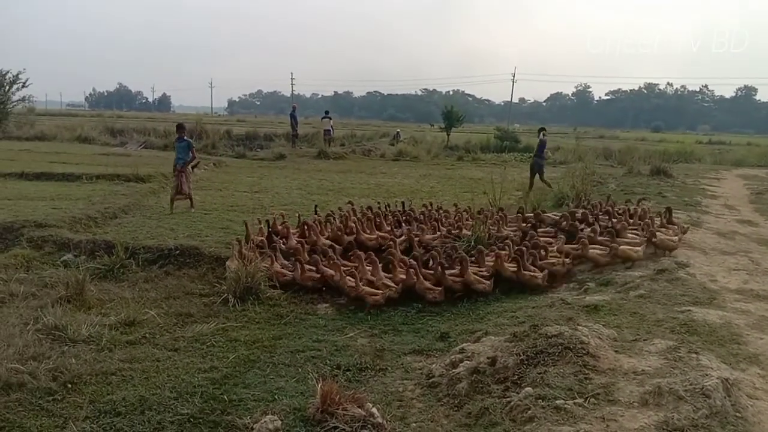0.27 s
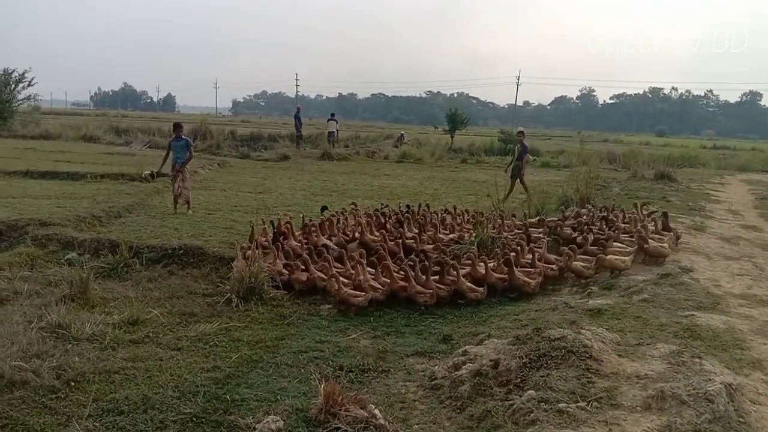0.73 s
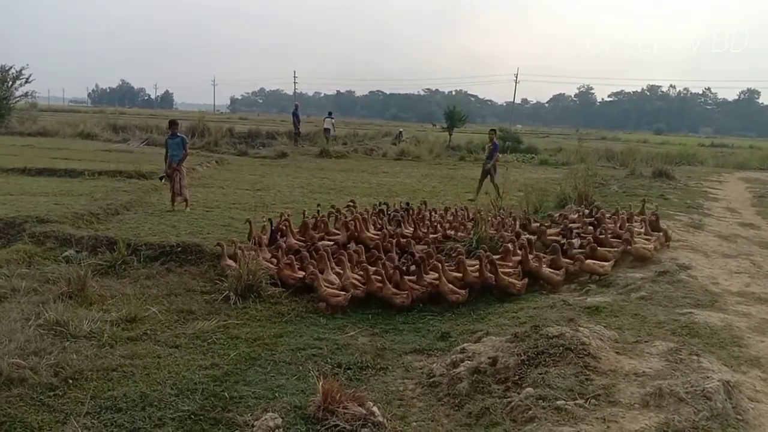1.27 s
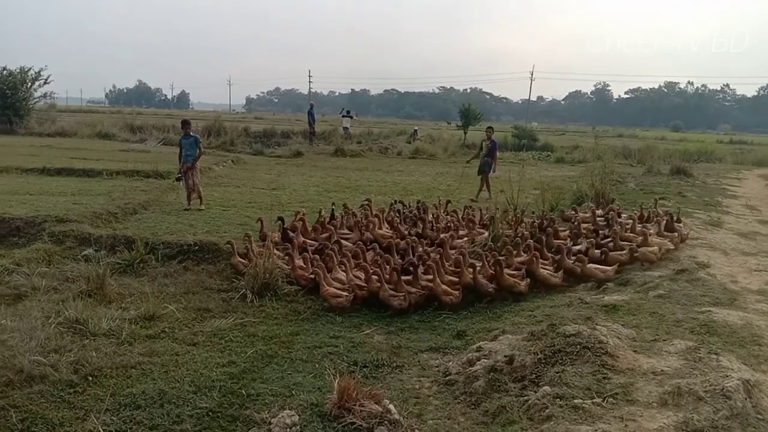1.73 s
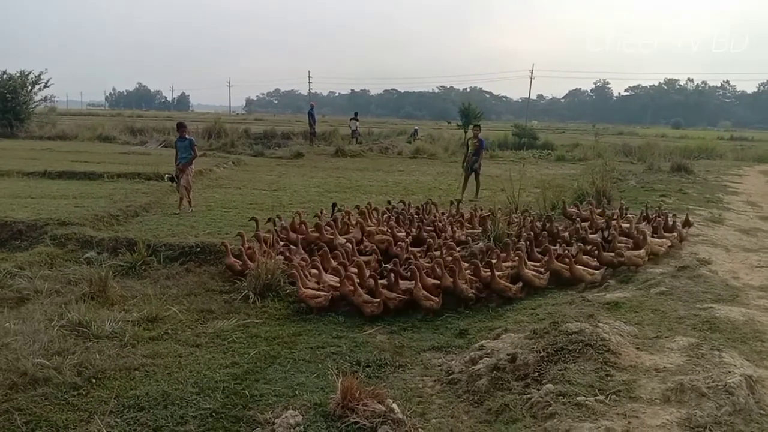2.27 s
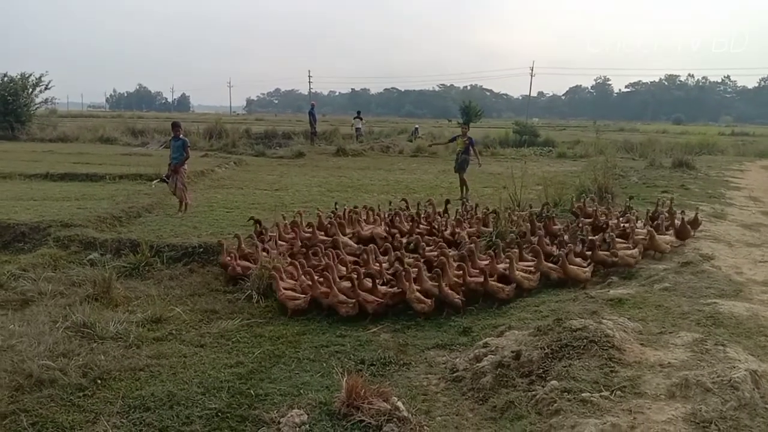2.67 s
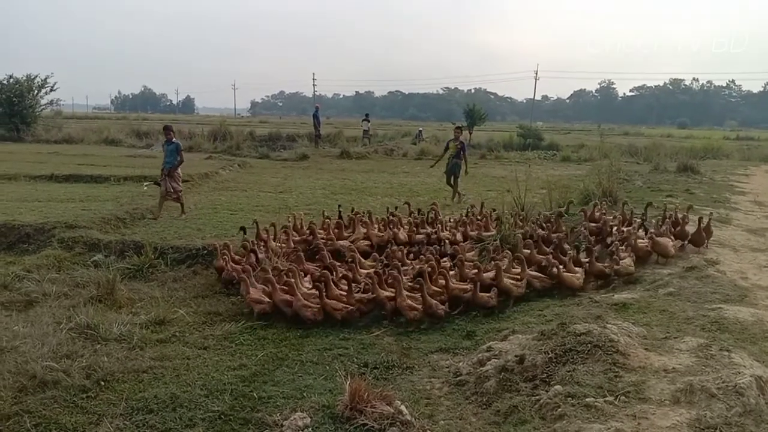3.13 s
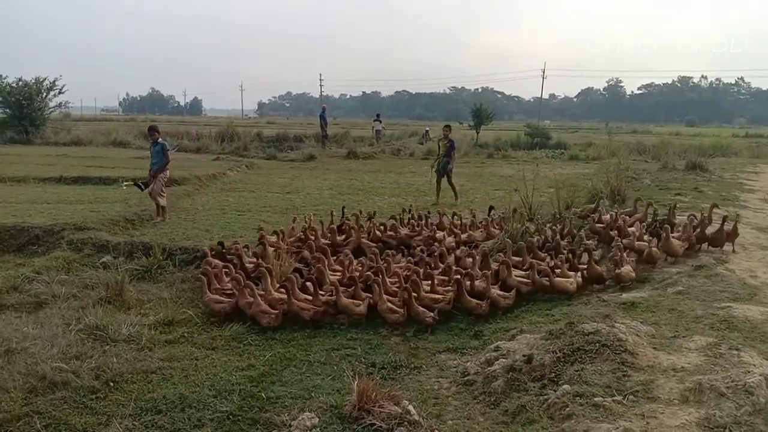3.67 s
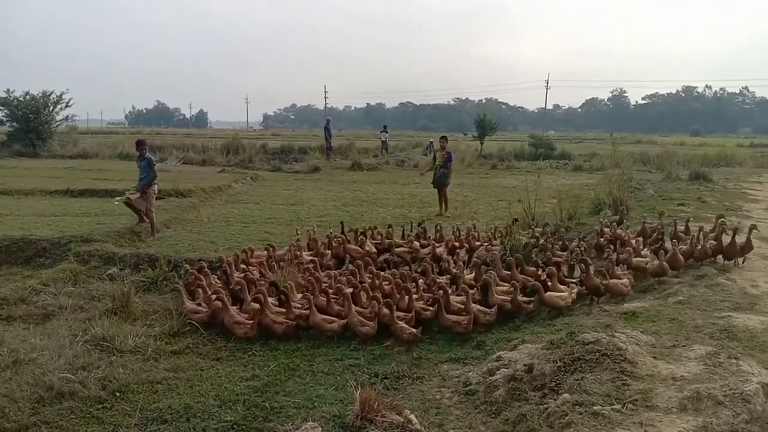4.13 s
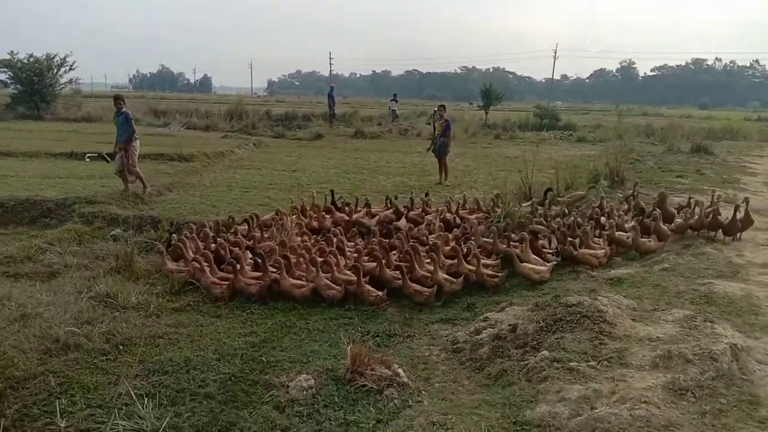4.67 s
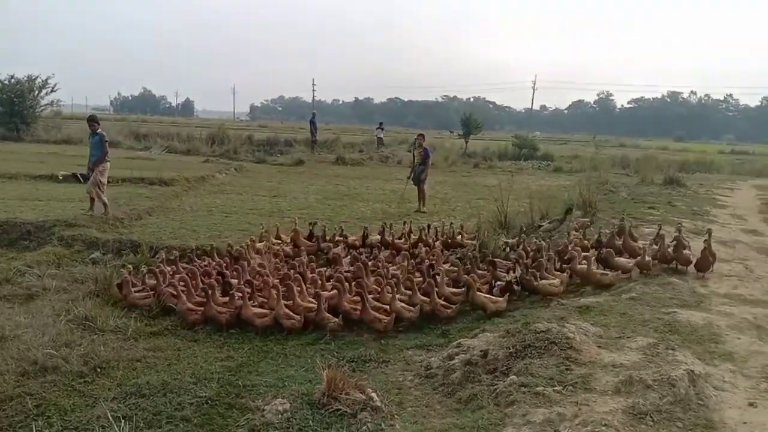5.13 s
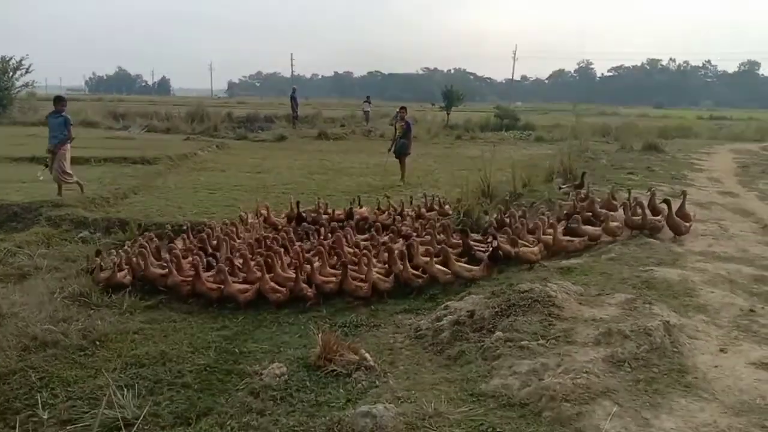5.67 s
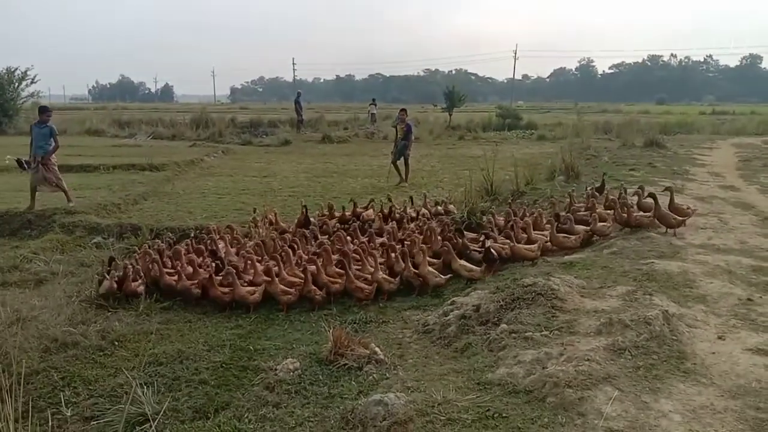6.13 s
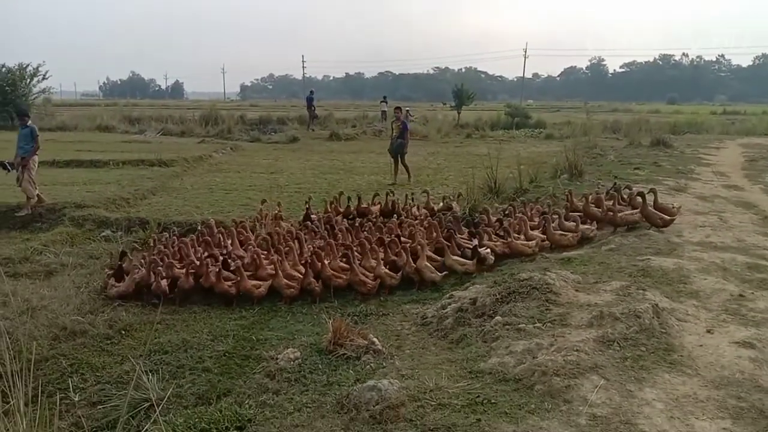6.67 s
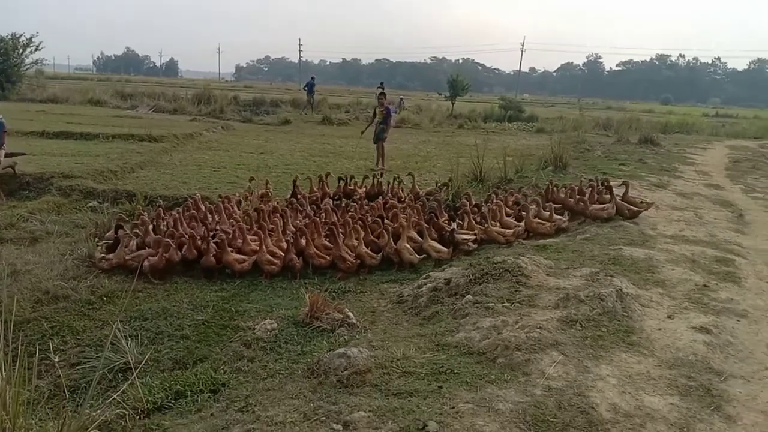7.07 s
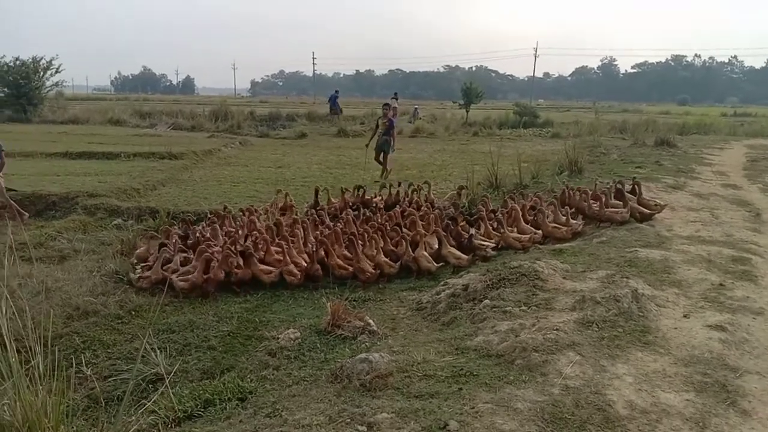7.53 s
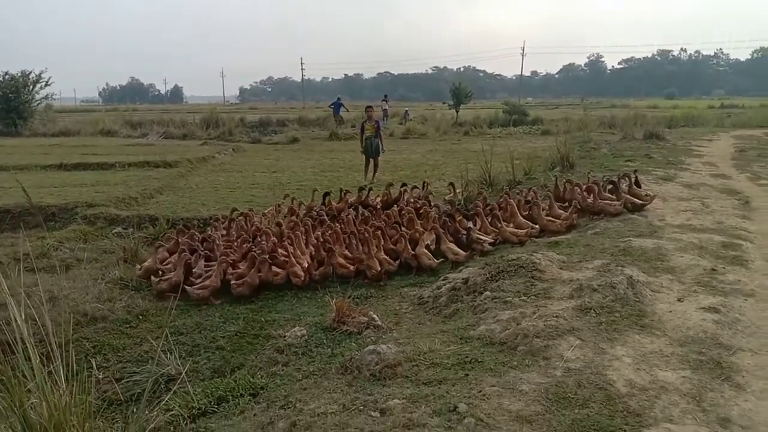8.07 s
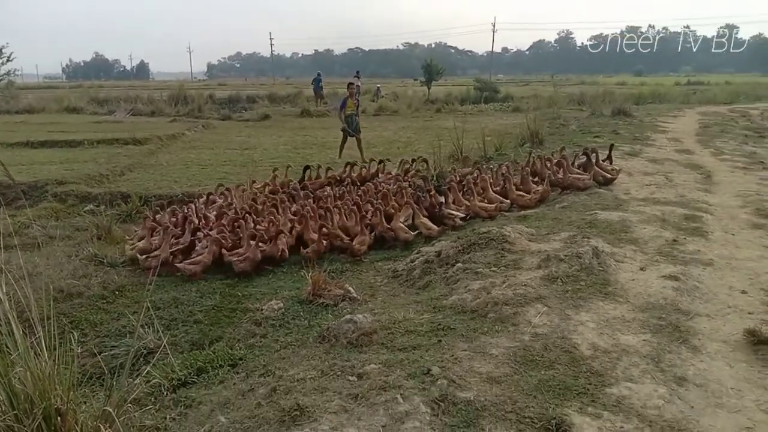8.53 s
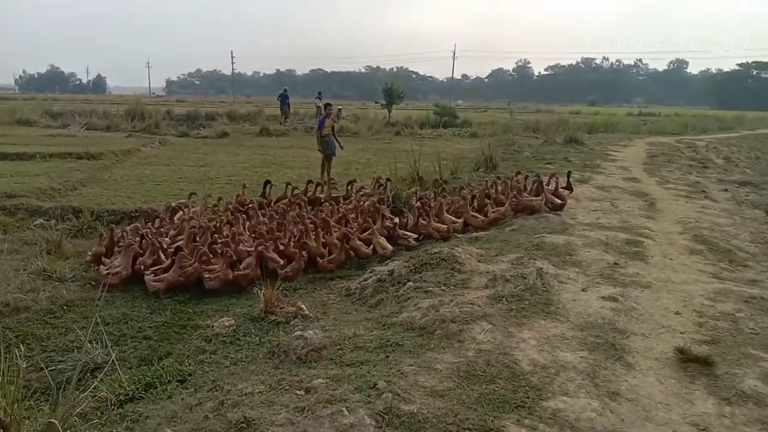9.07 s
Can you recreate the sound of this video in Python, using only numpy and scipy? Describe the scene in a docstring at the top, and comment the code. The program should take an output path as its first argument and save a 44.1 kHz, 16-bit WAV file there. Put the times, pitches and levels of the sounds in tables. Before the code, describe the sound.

A large flock of ducks quacks from start to finish, the short, nasal, raspy calls overlapping in quick bunches. Very faint crickets trill in the grass over soft air. Late on, the quacking eases briefly and a nearer cricket gives four quiet chirps, each louder than the last, before the ducks pick up again. The sound is heard through a phone microphone some metres from the flock in a dry, open field.

```python
"""A dry field, a phone microphone some metres from a flock of ducks. From the start the quacks
overlap in bunches, each a train of syrinx pulses and breath ringing through throat and bill.
Crickets trill faintly in the grass with their wings, over soft air and far insects.
From about seven seconds a nearer cricket chirps four times, louder each time, as the ducks go on."""
import sys
import numpy as np
from scipy.fft import rfft, irfft, next_fast_len
from scipy.io import wavfile
from scipy.ndimage import map_coordinates

SR = 44100
rng = np.random.default_rng(int(sys.argv[2]) if len(sys.argv) > 2 else 0)


def to_wav(sig):
    """Store sig (one row per channel, or 1-D mono) as 16-bit WAV at the path in sys.argv[1].

    Samples outside -1..1 are clipped; the rate is SR.
    """
    pcm = np.clip(np.atleast_2d(sig), -1, 1) * 32767
    pcm = np.round(pcm).astype(np.int16)
    wavfile.write(sys.argv[1], SR, pcm.T)  # frames by channels


N = 409688


def amp(db):
    return 10 ** (np.asarray(db) / 20)


def unit(x):
    return x / np.sqrt(np.mean(x ** 2, axis=-1, keepdims=True) + 1e-20)


def filtered(x, response):
    """x times a complex response of frequency, or several responses as rows."""
    m = next_fast_len(len(x) + 1024, real=True)
    return irfft(rfft(x, m) * response(np.fft.rfftfreq(m, 1 / SR)), m)[..., :len(x)]


def modes(table):
    """Causal response of (Hz, width in Hz, dB) resonances."""
    return lambda f: sum((-1) ** k * amp(db) * 1j * f * w / (c * c - f * f + 1j * f * w)
                         for k, (c, w, db) in enumerate(table))


def falloff(f, hz, order):
    """Response that drops steeply above hz."""
    return 1 / (1 + (1j * f / hz) ** 2 + .7j * f / hz) ** order


def wobble(rate, size):
    """A smooth random curve, rate knots a second."""
    knots = rng.standard_normal(int(size * rate / SR) + 4)
    return map_coordinates(knots, [np.arange(size) * rate / SR])


def noise_band(hz, width_hz):
    return unit(filtered(rng.standard_normal(N), lambda f: modes([(hz, width_hz, 0)])(f) ** 2))


def individual(table, spread, spread_db):
    """Every bird has its own throat and bill: resonances shifted and reweighted."""
    return modes([(hz * np.exp(spread * rng.standard_normal()), width,
                   db + spread_db * rng.standard_normal()) for hz, width, db in table])


def syrinx(t, arch, pitch_hz, rasp_db):
    """Uneven pulses, each with a puff of breath; in a low voice they are strong and weak in turn."""
    scatter, air, knots = (rng.standard_normal(SR // n) for n in (300, 3, 1000))
    doubled = pitch_hz < 170
    jitter = np.interp(rasp_db, [-12, -3], [.05, .03]) * np.interp(80 * t, np.arange(len(knots)), knots)
    cycles = np.cumsum(pitch_hz * (1 + doubled) * (1 + .08 * arch) * (1 + jitter)) / SR + rng.random()
    count = cycles // 1
    sizes = amp(2.2 * scatter[count.astype(int)] - 7 * doubled * (count % 2))
    pulses = unit(np.diff(count, prepend=0) * sizes)
    breath = unit(np.exp(-3 * (cycles % 1)) * air[:len(t)])
    return pulses + np.interp(rasp_db, [-12, -3], [.55, .35]) * breath


def quack(length, pitch_hz, rasp_db, chest_db, attack=.018, release=.028):
    """One bird: the syrinx rings chest, throat and bill; a neighbour's body throws back an echo."""
    # Each row of both: resonance in Hz, width in Hz, relative level in dB.
    throat_modes = [(617, 140, -23.5), (905, 142, -17.5), (1249.5, 53.7, 1.5), (1523, 233, -9.5),
                    (2138, 274, -22.5), (2565, 57, -23)]
    bill_modes = [(3528, 67, -11.5), (4326, 170, -15), (4900, 192, -12), (5566, 210, -9.5),
                  (6643, 157, -21.5)]
    t = np.arange(int((length + attack + release) * SR)) / SR
    arch = -(2 * t / t[-1] - .9) ** 2  # peaks at zero just before mid-call
    ramp = np.clip(np.minimum(t / attack, (t[-1] - t) / release) / 2, 0, 1)
    swell = np.sin(np.pi / 2 * ramp) ** 2 * amp(7 * arch)
    source = syrinx(t, arch, pitch_hz, rasp_db)
    echo = int(rng.uniform(.002, .009) * SR)
    source[echo:] += .37 * source[:-echo].copy()
    effort = min(amp(rasp_db + 8), 1)  # a soft call keeps only the low resonances
    throat, bill = individual(throat_modes, .023, 3.75), individual(bill_modes, .037, 3.23)
    nasal, rasp, chest, hum = unit(filtered(source, lambda f: [
        throat(f) * falloff(f, 3750, order=2) * (effort + (1 - effort) * falloff(f, 1180, order=1)),
        bill(f) * falloff(f, 7550, order=3) * (1 - falloff(f, 4000, order=1)),
        modes([(245, 120, 0)])(f) ** 2,
        modes([(860, 260, 0)])(f) ** 2 * falloff(f, 3000, order=1)]))
    voice = 1.42 * np.exp(-t / .015) * hum  # before the bill opens
    voice += (1 - 1.1 * np.exp(-t / .016)) * nasal + swell ** .27 * amp(rasp_db) * rasp
    gape = np.cumsum(1.02 + .08 * arch)  # pitch and resonances rise as the bill opens, then sag
    return swell * (map_coordinates(voice, [gape], mode="nearest") + amp(chest_db) * chest)


def in_turn(bunches, longest_s=.115):
    """A long bunch is two birds calling in turn."""
    for start, length, db, rasp_db in bunches:
        birds = 1 + (length > longest_s)
        for k in range(birds):
            yield start + k * length / birds, length / birds, db, rasp_db


def ducks():
    """A near bird and a duller neighbour call almost together; a far bird drawls on as they end."""
    # Each row: start in seconds, length in seconds, throat level in dB, rasp in dB over the throat.
    bunches = [(0, 0.076, -28.5, -11.5), (0.104, 0.072, -38.5, -10.5), (0.195, 0.047, -30, -9.5),
               (0.279, 0.11, -31.5, -13), (.363, 0.15, -30.5, -8.5), (0.505, 0.08, -28.5, -9),
               (0.61, 0.083, -29.5, -4.5), (0.709, 0.051, -32, -11), (0.792, 0.034, -33, -11),
               (0.853, 0.033, -31.5, -7.5), (0.931, .04, -62, -18), (0.973, 0.029, -35.5, -8.5),
               (1.025, 0.053, -32.5, -16), (1.106, 0.081, -31, -9), (1.225, 0.079, -32.5, -13.5),
               (1.315, 0.18, -31.5, -8), (1.486, 0.036, -32, -18), (1.529, .1, -31, -8.5),
               (1.67, 0.15, -32.5, -13), (1.82, 0.12, -30, -7), (1.998, 0.14, -30.5, -7),
               (2.106, 0.068, -25, -6.5), (2.189, 0.036, -52.5, -16), (2.26, 0.044, -33, -7.5),
               (2.303, .16, -27.5, -6.5), (2.525, 0.064, -30, -14), (2.567, 0.078, -32, -2.5),
               (2.685, .13, -28, -9.5), (2.804, .16, -34, -2), (2.992, 0.07, -37, -13.5),
               (3.057, 0.075, -26, -7), (3.194, 0.074, -26.5, -5), (3.315, 0.095, -28.5, -5.5),
               (3.412, 0.13, -27.5, -8), (3.517, 0.08, -25.5, -5.5), (3.637, 0.091, -29, -4.5),
               (3.741, 0.1, -28.5, -12), (3.913, 0.17, -26.5, -5), (4.095, .055, -27, -9.5),
               (4.239, .11, -34, -13.5), (4.319, .18, -25.5, -3.5), (4.506, .14, -33, -5),
               (4.612, 0.11, -29, -5), (4.768, 0.081, -26.5, -4.5), (4.871, .062, -24.5, 0),
               (4.937, 0.054, -27, -10), (5.03, 0.076, -28, -5.5), (5.117, 0.046, -26.5, -8.5),
               (5.196, 0.12, -27.5, -11.5), (5.337, .13, -26.5, -5), (5.482, .069, -25, -13),
               (5.579, 0.043, -35, -30), (5.695, 0.054, -29, -10), (5.789, 0.086, -25, -5.5),
               (5.927, 0.081, -36, -48.5), (6.008, .081, -42.5, -12), (6.099, 0.081, -30.5, -5),
               (6.199, 0.11, -27.5, -5.5), (6.332, 0.1, -26, -2), (6.451, 0.079, -33, -12),
               (6.567, 0.053, -32, -12.5), (6.692, 0.045, -39, -18.5), (6.737, 0.11, -29, -6.5),
               (6.877, 0.039, -32.5, -14), (7.052, 0.037, -51, -11.5), (7.085, 0.088, -33, -13.5),
               (7.21, 0.058, -34.5, -16.5), (7.342, 0.094, -35.5, -12), (7.478, .04, -31.5, -10.5),
               (7.609, 0.061, -34, -16.5), (7.706, 0.14, -31.5, -13.5), (7.925, .12, -28, -14),
               (8.059, 0.093, -31, -12), (8.148, 0.082, -25, -8), (8.339, 0.15, -27.5, -4.5),
               (8.546, 0.065, -28.5, -11.5), (8.63, .073, -28.5, -3.5), (8.719, 0.18, -28, -8.5),
               (8.94, 0.041, -30.5, -3.5), (9.012, 0.11, -25.5, -6), (9.123, 0.074, -28.5, -6),
               (9.206, 0.043, -26, -7)]
    # The flock turns. Each row: time in seconds, chest level in dB over the throat.
    chest_levels = [(3.8, -12.5), (7.5, -16.5), (9.3, -13)]
    # The far side of the flock. Each row: time in seconds, level in dB.
    far_levels = [(0, -46), (3.85, -31), (4.05, -55), (4.3, -34.5), (6.25, -29), (6.4, -63.5), (7.5, -56),
                  (8, -38), (8.4, -41), (9.3, -35)]
    flock = np.zeros(N + 2 * SR)
    for start, length, db, rasp_db in in_turn(bunches):
        length = np.clip(length, .02, .25)
        near_hz = 286.1 + 4.5 * max(rasp_db, -18)  # the harder the rasp, the higher the voice
        near_hz *= np.exp(.05 * rng.standard_normal())
        if rng.random() < .5 or rasp_db > -5:  # hoarse: an octave down
            near_hz /= 2
        neighbour_hz, far_hz = rng.uniform(190, 290, size=2) / rng.choice([1, 2], size=2, p=[.7, .3])
        chest_db = np.interp(start, *np.transpose(chest_levels))
        far_db = np.interp(start, *np.transpose(far_levels))
        birds = [(-.014, length, near_hz, db, rasp_db),
                 (rng.uniform(-.3, .3) * length, length, neighbour_hz, db + .5, rasp_db - 1),
                 (length - rng.uniform(0, .09), .12, far_hz, far_db, -14)]
        for delay, span, hz, level_db, bird_rasp_db in birds:
            call = amp(level_db) * quack(span, hz, bird_rasp_db, chest_db)
            flock[SR + round((start + delay) * SR):][:len(call)] += call
    return flock[SR:SR + N]


def trill(rate_hz, ring):
    """Nearly steady wing strokes, each letting through a short burst of the wing's ring."""
    strokes = np.cumsum(rate_hz * (1 + .0051 * wobble(3.34, N))) / SR
    return np.sin(np.pi * strokes) ** 4 * ring


def far_crickets():
    """Wings scrape back in the grass: one cricket holds steady, two swell and fade."""
    chorus = amp(-68) * trill(115.6, noise_band(10700, 700))
    for hz, rate_hz, db in [(9300, 95, -70), (9850, 90, -74)]:
        chorus += amp(db + 6 * np.tanh(2 * wobble(5, N))) * trill(rate_hz, noise_band(hz, 250))
    return chorus


def field():
    """Faint air and far insects; also a thin, very high hiss that fades after about 6.5 seconds."""
    # Each row: frequency in Hz, relative noise density in dB.
    air_spectrum = [(30, -16), (100, 3), (270, -15), (8100, -31), (9200, -20), (11000, -21), (11900, -36),
                    (13600, -36), (15000, -36)]
    # Each row: time in seconds, level in dB.
    hiss_levels = [(0.0, -89), (3.26, -76), (6.37, -83), (6.75, -87), (6.88, -94), (9.29, -93)]
    hz, db = np.transpose(air_spectrum)
    air = filtered(rng.standard_normal(N), lambda f: amp(np.interp(np.log(f + 1), np.log(hz), db)))
    hiss = noise_band(15000, 900)
    hiss_db = np.interp(np.arange(N) / SR, *np.transpose(hiss_levels)) + 3 * wobble(7, N)
    return amp(-68 + 2 * wobble(6, N)) * unit(air) + amp(hiss_db) * hiss


def near_cricket(chirp_s=.23):
    """Each chirp is a short run of wing strokes, rising in pitch and level."""
    # Each row: start in seconds, peak level in dB.
    chirps = [(6.902, -65), (7.19, -59), (7.503, -56), (7.82, -53.5)]
    t, ring = np.arange(N) / SR, np.zeros(N)
    for start, db in chirps:
        progress = np.clip((t - start) / chirp_s, 0, 1)
        hz = 8700 + 310 * np.clip(1.7 * progress, 0, 1) + 50 * wobble(400, N)
        swell = amp(db - 7.7 * (1 - progress) ** 2) * (progress > 0) * (progress < 1)
        ring += swell * np.sin(2 * np.pi * np.cumsum(hz) / SR)
    return trill(100, ring)


def scene():
    return (ducks() + far_crickets() + field() + near_cricket())[None]


def record(dry):
    """The phone keeps nothing above its band limit."""
    return filtered(dry[0], lambda f: f < 15500)[None]


dry = scene()
out = record(dry)
to_wav(out)
```